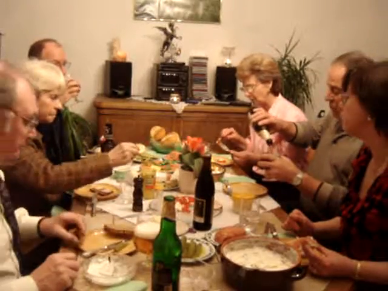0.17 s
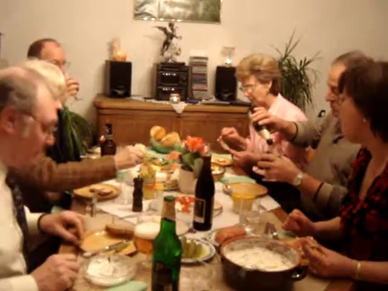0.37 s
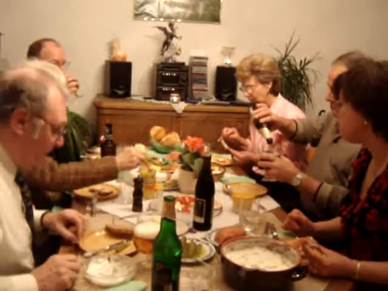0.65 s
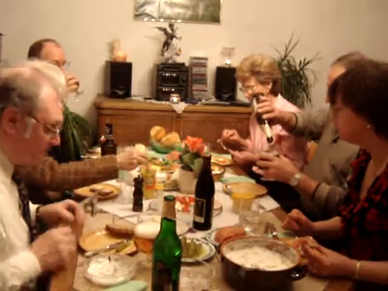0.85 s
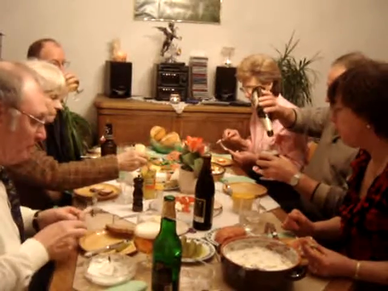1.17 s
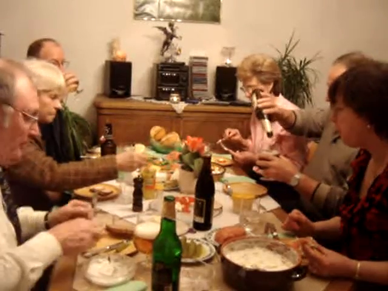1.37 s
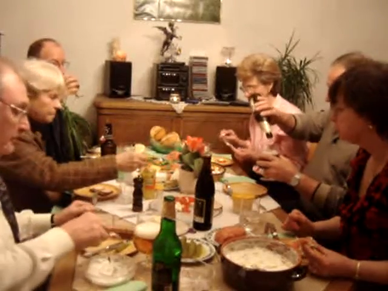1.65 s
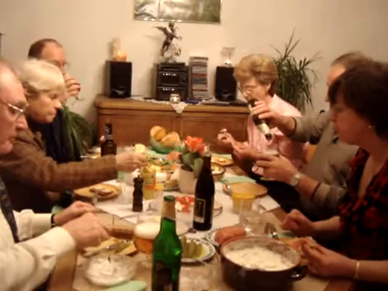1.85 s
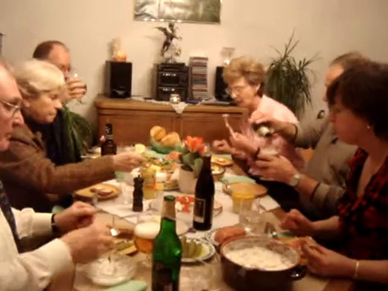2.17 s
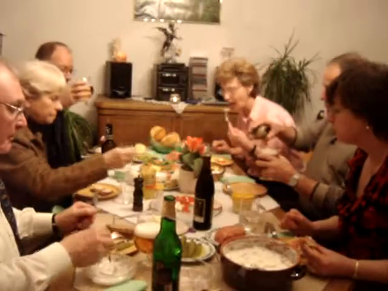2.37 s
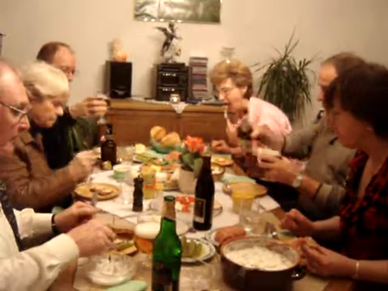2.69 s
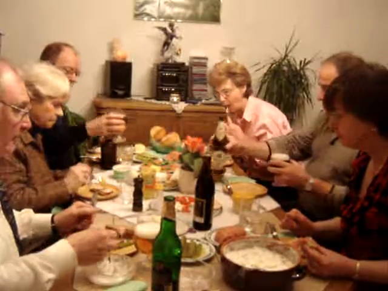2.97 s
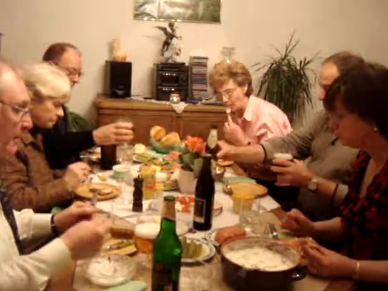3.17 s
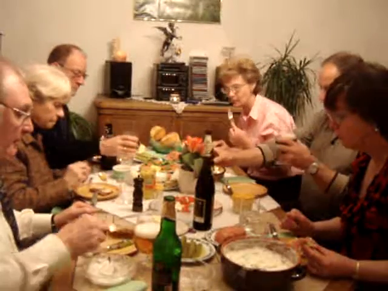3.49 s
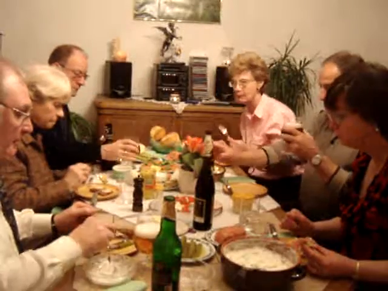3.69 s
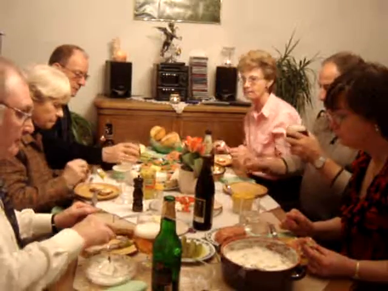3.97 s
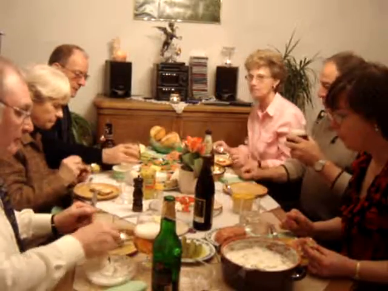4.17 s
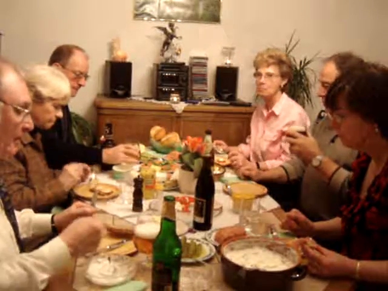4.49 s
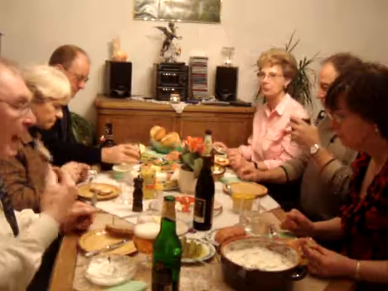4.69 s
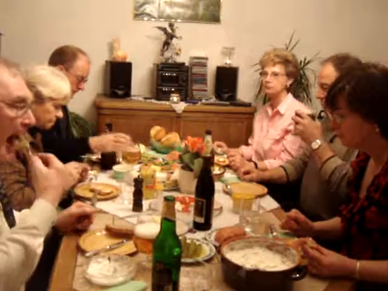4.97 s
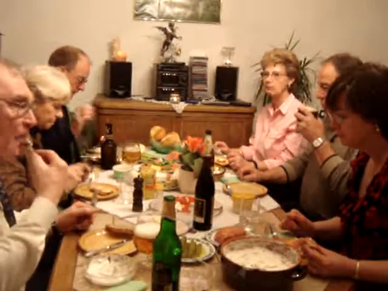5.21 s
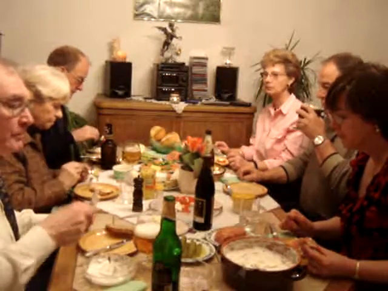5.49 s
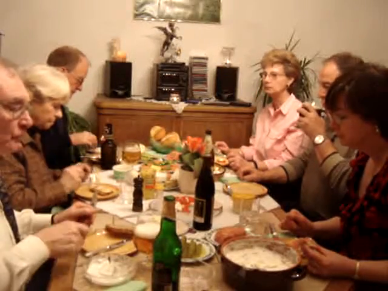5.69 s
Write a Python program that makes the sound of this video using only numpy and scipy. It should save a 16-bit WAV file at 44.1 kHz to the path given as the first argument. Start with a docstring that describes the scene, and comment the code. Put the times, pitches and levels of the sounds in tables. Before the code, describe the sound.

A brisk rattle of metal on crockery opens, then sparse, very quiet ticks. A clearer clink comes before three seconds, then a sharp wooden knock from a glass set down, the loudest event. Afterwards only small cutlery ticks and dull table bumps remain. Short indoor reflections, soft hiss and a faint hum surround it, heard through a small microphone with dulled top treble.

```python
"""A quiet furnished room, at the dinner table, heard through a small microphone.
Cutlery clatters onto a plate and scrapes, forks tick on crockery: struck or rattled sets of decaying modes.
A heavy glass is set down hard on the wooden table top at 3.37 s and soft bumps pass through the wood: short
pressure swings and ringing wood modes. Short reflections follow; under it lie the room's rumble and hiss
as filtered noise, and a faint hum of narrow resonances."""
import sys
import numpy as np
from scipy import signal
from scipy.io import wavfile

SR = 44100
rng = np.random.default_rng(int(sys.argv[2]) if len(sys.argv) > 2 else 0)


def inscribe(sig):
    """Save sig as 16-bit PCM at rate SR to the path in sys.argv[1].

    A 1-D sig is mono; a 2-D sig holds one channel per row.
    Samples are clipped to [-1, 1] before scaling.
    """
    pcm = np.round(np.clip(np.atleast_2d(sig).T, -1, 1) * 32767)
    wavfile.write(sys.argv[1], SR, pcm.astype(np.int16))


def how_loud(loudness_db):
    """Turn decibels into a plain amplitude multiplier (0 dB gives 1, 20 dB gives 10)."""
    steps = np.asarray(loudness_db, float) / 20
    return 10 ** steps


N = 257870  # length in samples


def unit_rms(x):
    """Scale to unit rms."""
    return x / np.sqrt(np.mean(x ** 2) + 1e-20)


def in_time(rows):
    """Columns of a table as curves, one value a sample."""
    start_s, *columns = np.transpose(rows)
    return [np.interp(np.arange(N) / SR, start_s, column) for column in columns]


def at_hz(points, hz):
    """Read a table on a log-frequency axis."""
    points = np.array(points)
    return np.interp(np.log(hz), np.log(points[:, 0]), points[:, 1])


def drift(rate_hz):
    """Slow chance of unit rms: noise through two equal low-pass poles, run at one value per 40 samples."""
    pole = np.exp(-2 * np.pi * rate_hz * 40 / SR)
    noise = rng.standard_normal(N // 40 + 2002)
    slow = signal.lfilter([1], [1, -2 * pole, pole * pole], noise)[2000:]  # skip the settling
    return np.interp(np.arange(N) / 40, np.arange(len(slow)), unit_rms(slow))


def ring(clicks, hz, t60_s):
    """A two-pole resonance: a unit click sets a decaying sine of starting height 1 ringing."""
    radius = how_loud(-60 / (t60_s * SR))
    angle = 2 * np.pi * min(hz, SR / 2.1) / SR
    return signal.lfilter([0, np.sin(angle)], [1, -2 * radius * np.cos(angle), radius * radius], clicks + 1e-18)


def bands(size):
    """Third-octave bands of noise with their centres; neighbours are unrelated."""
    edges = 22 * 2 ** (np.arange(28) / 3)
    white = rng.standard_normal((2, size))
    for k, (low, high) in enumerate(zip(edges, edges[1:])):
        band_pass = signal.butter(2, [low, high], "band", fs=SR, output="sos")
        yield np.sqrt(low * high), signal.sosfilt(band_pass, white[k % 2])


# spectrum of the room's rumble and hiss: pitch_hz [Hz], density_db [dB per Hz, relative]
ROOM_SPECTRUM = [(15, -53), (25, -15), (48, -7), (150, -7), (184, -6), (321, -3.5), (346, 2), (383, -11),
                 (413, -5.5), (1930, -15.5), (2360, -15), (2970, -17), (8160, -22), (9730, -16.5),
                 (10500, -37), (13600, -71), (22000, -120)]
# slow swell of the low bands, counted from its median: start_s [s], level_db [dB]
STIR_SWELL = [(0.0, -55), (0.78, -53.5), (2.61, -52.5), (2.88, -51), (3.21, -52), (3.55, -54.5),
              (3.74, -54), (4.1, -50.5), (5.37, -55), (5.85, -54)]


def background(level_db, patchy_db):
    """Rumble and hiss as noise bands; the low bands swell as people stir, the hiss stays even."""
    swell_db = in_time(STIR_SWELL)[0]
    swell_db = swell_db - np.median(swell_db)
    together = drift(3.7)  # common to all bands
    out = np.zeros(N)
    for hz, band in bands(size=N + SR):
        low_share = 1 / (1 + (hz / 1200) ** 2)
        moving_db = swell_db + patchy_db * (together + drift(10.0))
        out += band[SR:] * how_loud(at_hz(ROOM_SPECTRUM, hz) + low_share * moving_db)
    return how_loud(level_db) * unit_rms(out)


# faint steady tones: pitch_hz [Hz], level_db [dB rms], width_hz [Hz]
HUM_TONES = [(86.1, -76, 10), (111, -66.5, 5.5), (181.5, -68.5, 13), (352.8, -65.5, 1.16), (2320, -77, 12),
             (7920, -78, 35)]


def hum():
    """Wavering tones: noise through narrow resonances, slower to waver where narrower."""
    out = np.zeros(N)
    for hz, level_db, width_hz in HUM_TONES:
        tone = ring(rng.standard_normal(N + SR), hz, 2.5 / width_hz)[SR:]
        out += how_loud(level_db) * unit_rms(tone)
    return out


# decay of the furnished room: pitch_hz [Hz], t60_s [s]
ROOM_DECAY = [(100, 0.47), (300, 0.48), (800, 0.33), (2500, 0.29), (6000, 0.35), (10000, 0.15)]


def room(direct, first_s, rise_s):
    """Reflections start after a gap, thicken and die band by band."""
    t = np.arange(SR * 3 // 4) / SR
    tail = sum(band * how_loud(-60 * t / at_hz(ROOM_DECAY, hz)) for hz, band in bands(size=len(t)))
    tail *= np.clip((t - first_s) / rise_s, 0, 1)
    tail /= np.sqrt(np.sum(tail ** 2))
    return signal.fftconvolve(direct, tail)[:N]


# modes of the wooden table top: pitch_hz [Hz], level_db [dB, relative], t60_s [s]
WOOD_MODES = [(118.2, -12, 0.15), (160.3, -7.5, 0.3), (242, -4, 0.13), (299.3, -1, 0.073),
              (368, 2.5, 0.071), (478, 5, 0.048), (542, -7, 0.14), (687, -19, 0.15), (832, 5.5, 0.044),
              (830, -15.5, 0.18), (848, -0.5, 0.05), (1140, -29, 0.14), (1240, -22, 0.039)]
# blows on the table top: start_s [s], level_db [dB, nominal peak], pitch_hz [Hz, of the pressure swing]
BLOWS = [(0.108, -23, 564), (0.698, -43, 545), (2.835, -34, 920), (2.859, -40, 493), (2.899, -45.5, 183),
         (3.3669, -7.5, 760), (4.145, -38, 470), (4.199, -49, 522), (4.355, -39.5, 274), (4.428, -46, 296),
         (4.578, -53, 353), (4.833, -48, 145), (5.642, -35.5, 450)]


def bumps(wood_db, swing_cycles, contact_cycles):
    """Each blow is a short pressure swing at its own pitch and rings the wood; a lower one sounds duller."""
    swing, push = np.zeros(N), np.zeros(N)
    t = np.arange(SR // 20) / SR
    for start_s, level_db, hz in BLOWS:
        at = round(start_s * SR)
        age = t * hz / swing_cycles
        envelope = (age * np.exp(1 - age)) ** 2
        swing[at:at + len(t)] -= how_loud(level_db) * envelope * np.sin(2 * np.pi * hz * t)
        pulse = t * np.exp(-t * hz / contact_cycles)  # lower pitch, longer contact
        push[at:at + len(t)] += how_loud(level_db) * pulse / pulse.sum()
    wood = np.zeros(N)
    for k, (hz, level_db, t60_s) in enumerate(WOOD_MODES):
        wood += (-1) ** k * how_loud(level_db) * ring(push, hz, t60_s)  # neighbours in opposite sign
    return swing - how_loud(wood_db) * wood


# crockery and cutlery modes, ringing free: pitch_hz [Hz], level_db [dB, relative], t60_s [s]
CROCKERY_MODES = [(553, -13, 0.22), (793.4, -18.5, 0.55), (1015, -4, 0.061), (1224, -5, 0.045),
                  (1375, -2.5, 0.067), (1478, 7, 0.031), (1560, -10, 0.065), (1698, -2, 0.057),
                  (1810, -2, 0.057), (1930, 2, 0.11), (2090, 5, 0.041), (2140, -4, 0.059), (2280, -4, 0.12),
                  (2375, 1, 0.091), (2510, -6.5, 0.11), (2678, -1, 0.096), (3040, -5.5, 0.18),
                  (3266, 2, 0.068), (3410, -5.5, 0.039), (3580, -1, 0.06), (3780, -3.5, 0.088),
                  (3880, 1.5, 0.071), (4054, -6.5, 0.18), (4360, 2, 0.014), (5010, -2, 0.088),
                  (5170, 0.5, 0.038), (5400, -1, 0.028), (5700, -0.5, 0.05), (6370, -23, 0.034),
                  (6760, -6, 0.073), (7460, -8, 0.083), (7850, -13.5, 0.15), (8600, -16, 0.12),
                  (9640, -3, 0.041)]
# rattling, scraping strokes: peak_s [s], level_db [dB, nominal], rise_db [dB per s], fall_db [dB per s]
STROKES = [(0.0, -14, 200, 168), (0.101, -14.5, 165, 496), (0.168, -24, 502, 181), (0.3, -39, 155, 152),
           (0.385, -43, 402, 140), (0.54, -45.5, 500, 142), (0.74, -42.5, 118, 307),
           (2.839, -48.5, 2000, 252), (3.375, -30.5, 2499.5, 242), (4.15, -49, 1000, 200),
           (5.655, -47.5, 302, 300)]


def rattle(per_s, spread_db, ring_share):
    """Dense uneven little contacts ring the modes briefly, each in its own mixture; a light stroke is duller."""
    at = np.flatnonzero(rng.random(N) < per_s / SR)
    sizes = how_loud(spread_db * np.minimum(rng.exponential(1, len(at)), 3)) * np.sqrt(SR / per_s)
    # the loudest stroke rules at each moment
    slopes_db = [peak_db - np.where(at / SR > peak_s, fall_db, rise_db) * abs(at / SR - peak_s)
                 for peak_s, peak_db, rise_db, fall_db in STROKES]
    stroke_db = np.max(slopes_db, axis=0)
    # treble tilt in dB per octave: 1.16 at -16.5 dB, less by 0.75 for each dB lighter
    tilt_db = np.maximum(1.16 + 0.75 * (stroke_db + 16.5), -14)
    out = np.zeros(N)
    for hz, level_db, t60_s in CROCKERY_MODES:
        octaves = np.log2(max(hz, 750) / 2000)
        clicks = np.zeros(N)
        mixture = sizes * rng.standard_normal(len(at))
        clicks[at] = mixture * how_loud(stroke_db + level_db - 41 + tilt_db * octaves)
        out += ring(clicks, hz, t60_s * ring_share)
    return out


# single contacts: start_s [s], level_db [dB, nominal peak of the 1.2-3 kHz modes], low_pitch_hz [Hz, struck best],
# high_pitch_hz [Hz, upper mode struck best], high_level_db [dB, relative to the low modes]
CONTACTS = [(0.0024, -18.5, 1960, 3880, 0.5), (0.0484, -13.5, 1680, 3680, -0.5),
            (0.0706, -18.5, 1960, 3880, 0.5), (0.0899, -6, 2280, 3300, -14), (0.1002, -24, 2330, 3780, -14),
            (0.1644, -15.5, 2440, 3140, -13), (0.382, -30, 1337, 2860, -7), (0.453, -38, 1390, 3300, -18),
            (0.537, -38.5, 1620, 3350, -8.5), (0.642, -44.5, 2150, 3120, -1.5),
            (0.7022, -33.5, 1560, 3100, -13), (0.75, -37.5, 1710, 3040, -11),
            (1.202, -46.5, 2020, 4600, 2.5), (1.813, -48, 2420, 4690, -3), (1.989, -48, 2230, 3150, -21),
            (2.1478, -38, 2370, 3360, -18), (2.7339, -26.5, 2140, 5430, -4), (2.83, -39, 1930, 3040, -22),
            (2.99, -44.5, 1830, 4550, 4), (3.183, -56, 2350, 3520, 11), (3.3687, -14.5, 1577, 3300, -9.5),
            (3.379, -23.5, 2420, 4030, -0.5), (4.0219, -27.5, 2080, 5170, -8.5),
            (4.1073, -40.5, 2160, 4200, -0.5), (4.2276, -38, 1230, 3000, -19),
            (4.3992, -33.5, 1840, 4500, -6.5), (4.5131, -44.5, 2110, 5020, -4),
            (4.5266, -37.5, 2180, 4640, -7), (5.3512, -45, 2310, 4260, -8), (5.5707, -46.5, 2680, 3030, -8),
            (5.6413, -42.5, 2090, 3100, -2.5), (5.6637, -35, 1260, 3040, -9)]


def ticks(focus_octaves, aside_db, high_aside_db, spread_db, smear_s):
    """Each contact strikes every mode, weighted by where it lands and damped by the hand that holds the piece."""
    held_ring_share = 0.56  # a held piece rings for this share of its free t60
    dulling_db_per_octave = 0.5  # loss of the modes above the best-struck upper one
    out = np.zeros(N)
    chance = rng.random((len(CONTACTS), 3, len(CROCKERY_MODES)))
    hz, mode_db, t60_s = np.transpose(CROCKERY_MODES)[:, :, None]
    upper = hz > 2900
    t = np.arange(SR // 2) / SR
    for contact, (strength, side, late) in zip(CONTACTS, chance[..., None]):
        start_s, level_db, low_hz, high_hz, high_db = contact
        # in the low and in the high group the modes fall away on both sides of the one struck best
        away = np.log2(hz / np.where(upper, high_hz, low_hz)) / focus_octaves
        colour_db = np.maximum(-6 * away ** 2, np.where(upper, high_aside_db, aside_db))
        colour_db += upper * (high_db + 3.0)
        colour_db -= dulling_db_per_octave * np.maximum(np.log2(hz / high_hz), 0)
        # the blow reaches the parts of the piece a moment apart
        age = np.maximum(t - late * smear_s, 0)
        decay_db = -60 * age / (t60_s * held_ring_share)
        fading = how_loud(mode_db + colour_db + spread_db * (strength - 0.5) + decay_db)
        sound = np.sum(np.sign(side - 0.5) * fading * np.sin(2 * np.pi * hz * age), axis=0)
        at = round(start_s * SR)
        out[at:at + len(t)] += how_loud(level_db - 6.5) * sound[:N - at]
    return out


def scene():
    """Direct sounds from the table, their reflections and the room's own floor of sound."""
    table = ticks(focus_octaves=0.11, aside_db=-15, high_aside_db=-13, spread_db=10.0, smear_s=0.00249)
    table += rattle(per_s=350, spread_db=4.0, ring_share=0.31)
    table += bumps(wood_db=-11.5, swing_cycles=0.8, contact_cycles=0.063)
    # small things radiate no deep bass
    table = signal.sosfilt(signal.butter(2, 105, "high", fs=SR, output="sos"), table)
    reflections = how_loud(-5.5) * room(table, first_s=0.0046, rise_s=0.0021)
    mix = table + reflections + background(level_db=-53, patchy_db=2.0) + hum()
    return mix[None]


def low_pass(x):
    """Removes everything above the highest recorded frequency."""
    return signal.sosfilt(signal.butter(12, 10680, fs=SR, output="sos"), x)


def record(dry):
    """The small microphone's sound ends in a steep cut of the treble above 10 kHz."""
    steep = signal.ellip(12, 0.5, 60, 10080, fs=SR, output="sos")  # 0.5 dB ripple, 60 dB down
    mix = signal.sosfilt(steep, dry)
    return low_pass(mix)


dry = scene()
out = record(dry)
inscribe(out)
```